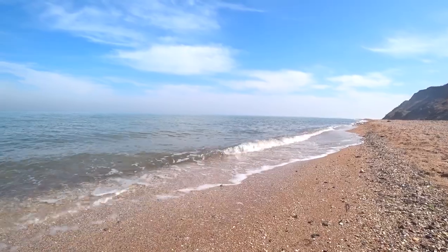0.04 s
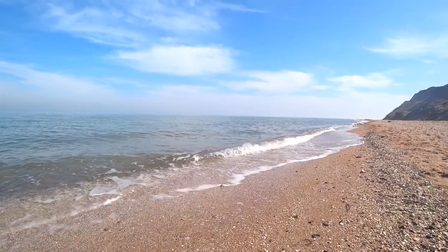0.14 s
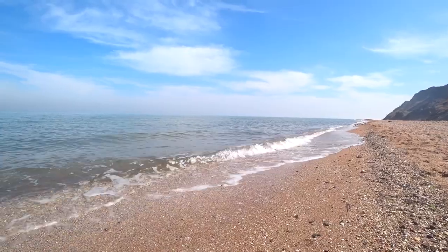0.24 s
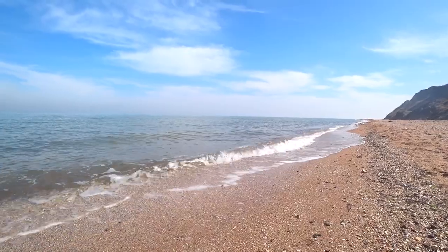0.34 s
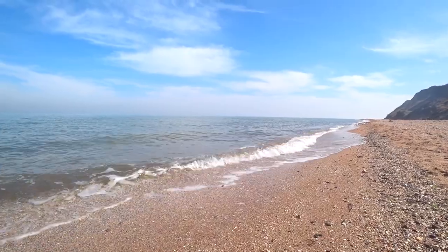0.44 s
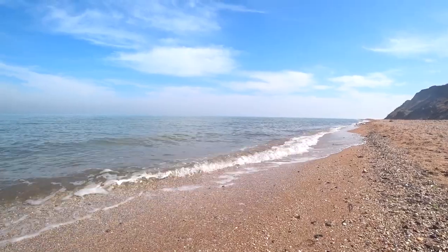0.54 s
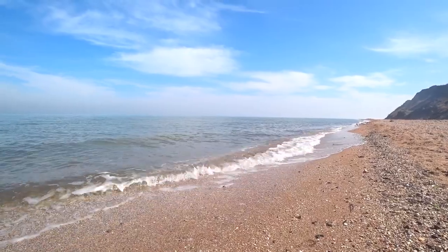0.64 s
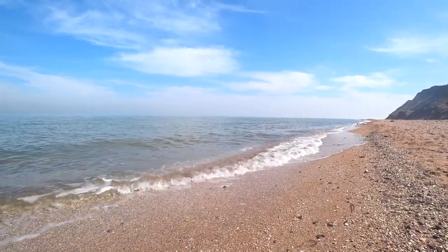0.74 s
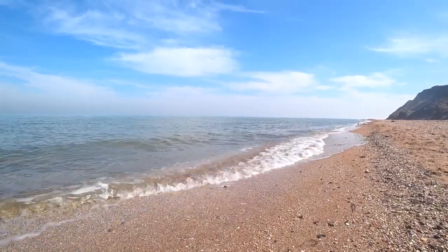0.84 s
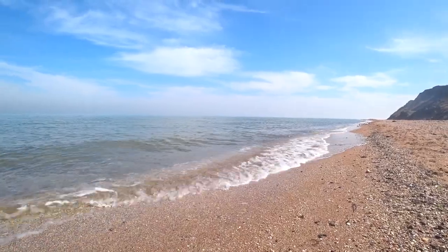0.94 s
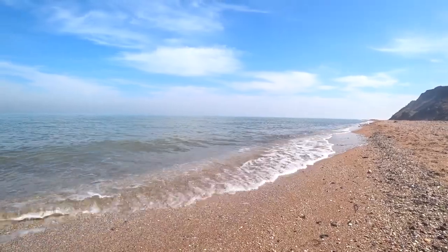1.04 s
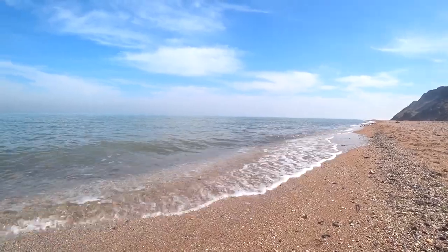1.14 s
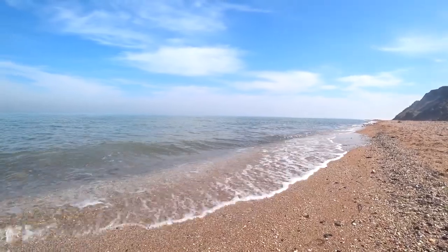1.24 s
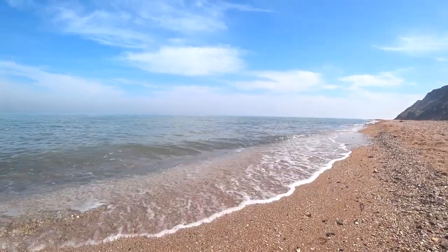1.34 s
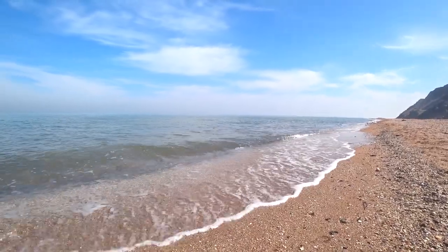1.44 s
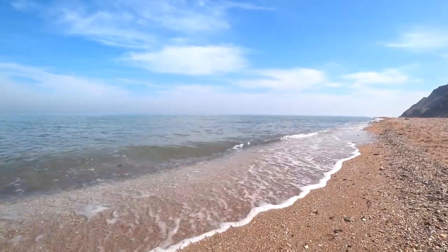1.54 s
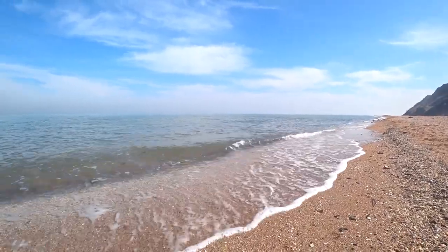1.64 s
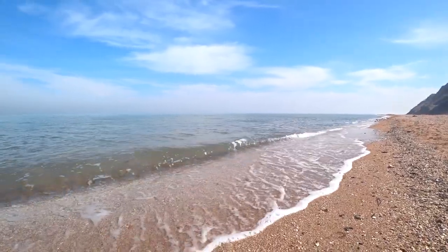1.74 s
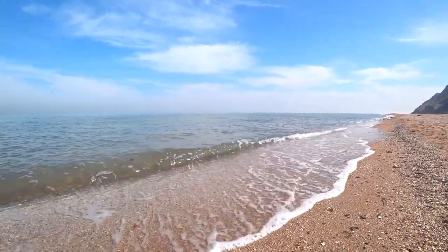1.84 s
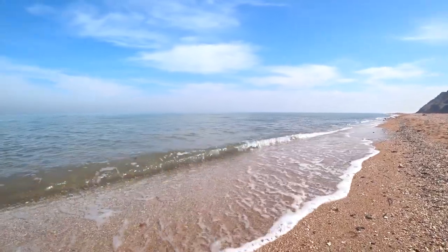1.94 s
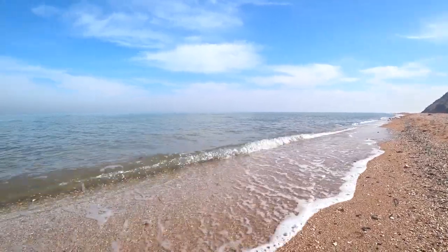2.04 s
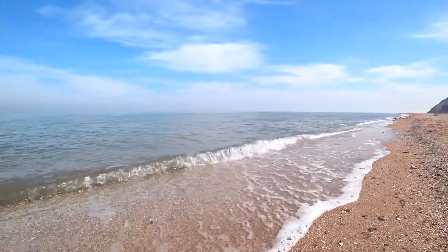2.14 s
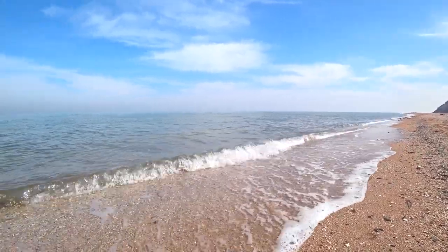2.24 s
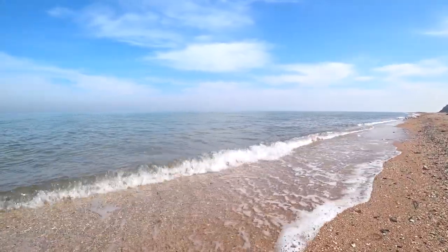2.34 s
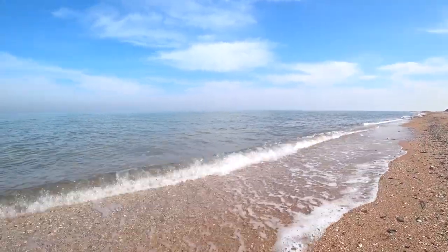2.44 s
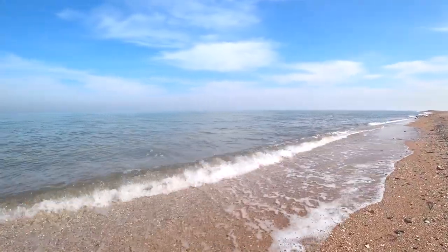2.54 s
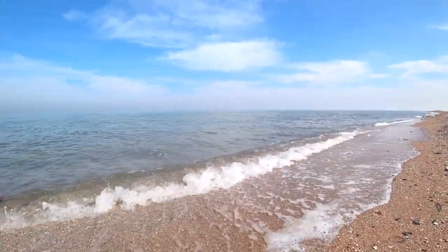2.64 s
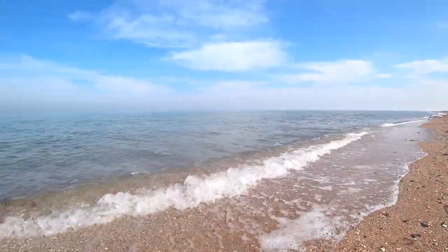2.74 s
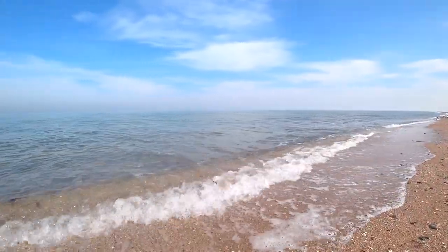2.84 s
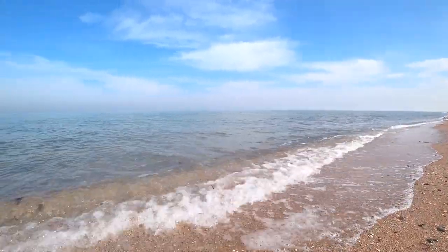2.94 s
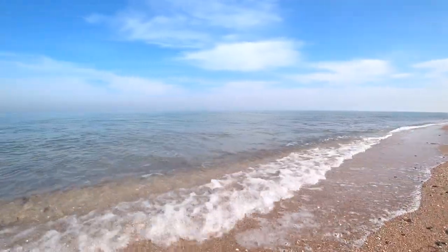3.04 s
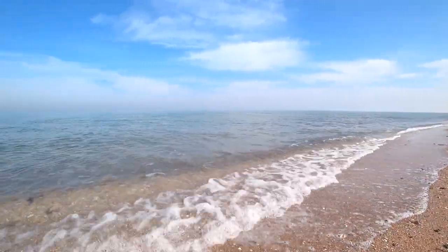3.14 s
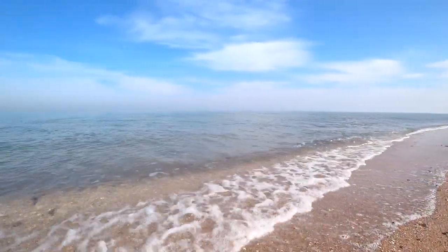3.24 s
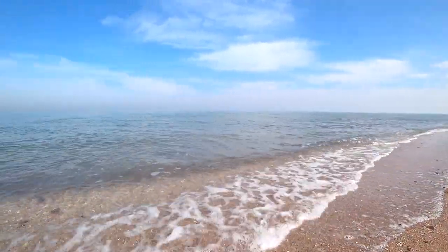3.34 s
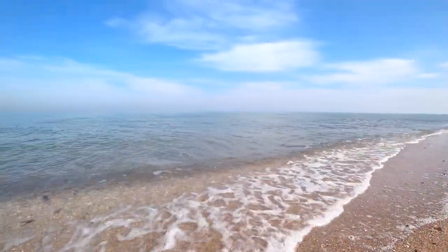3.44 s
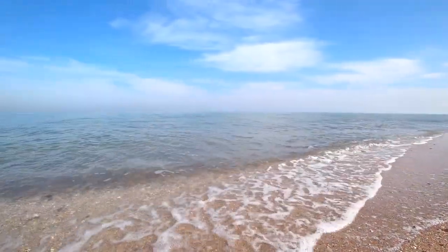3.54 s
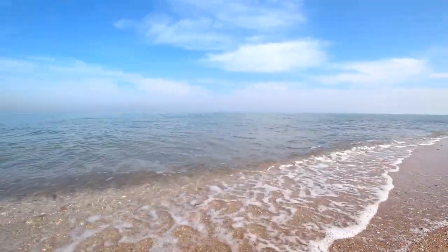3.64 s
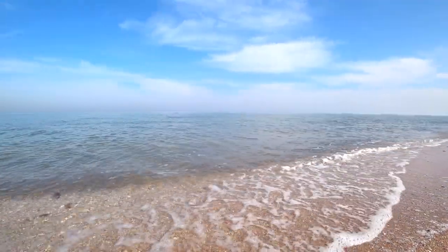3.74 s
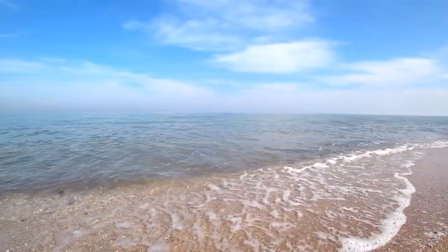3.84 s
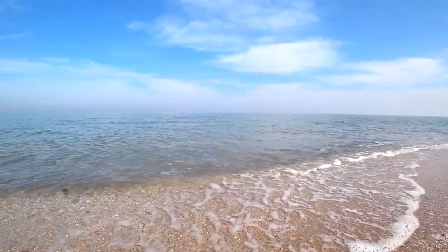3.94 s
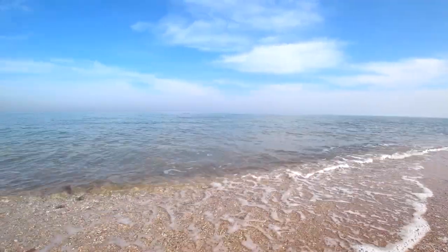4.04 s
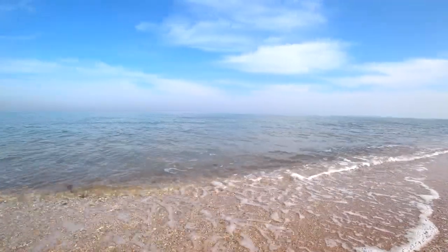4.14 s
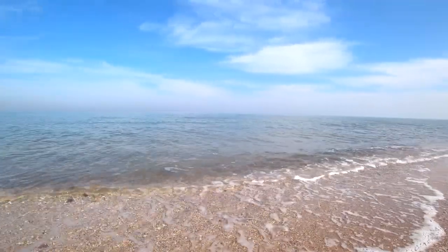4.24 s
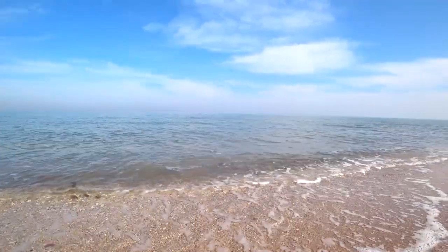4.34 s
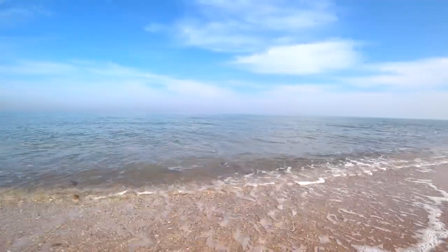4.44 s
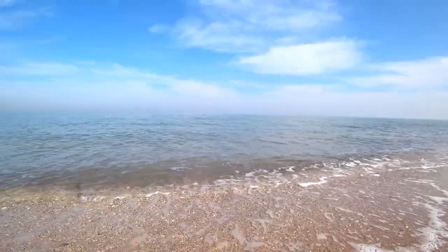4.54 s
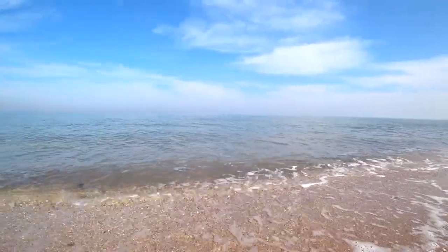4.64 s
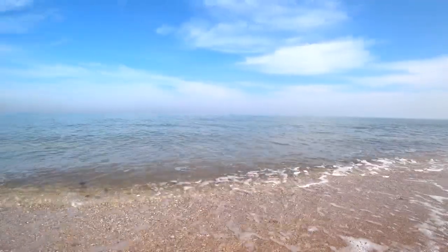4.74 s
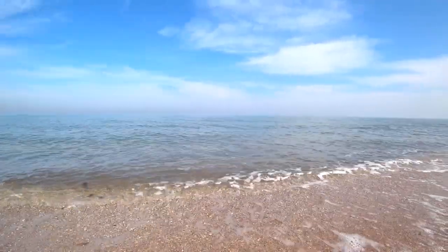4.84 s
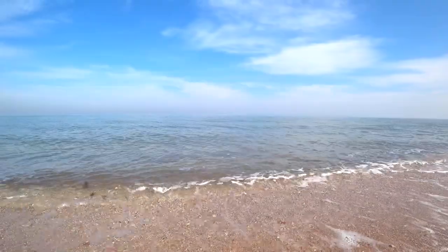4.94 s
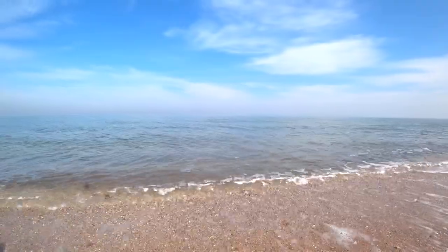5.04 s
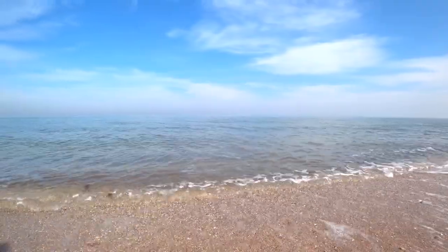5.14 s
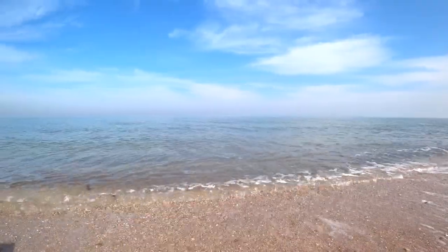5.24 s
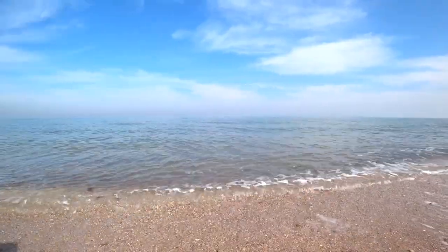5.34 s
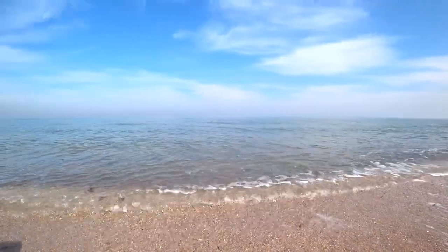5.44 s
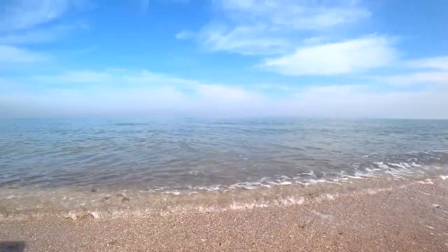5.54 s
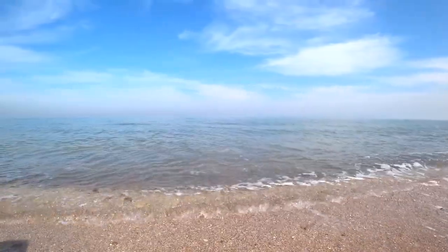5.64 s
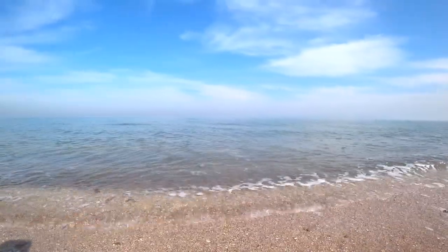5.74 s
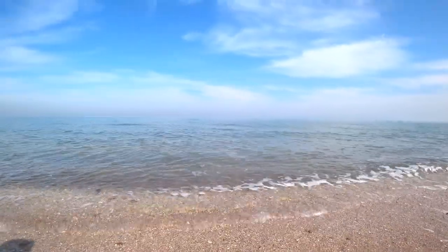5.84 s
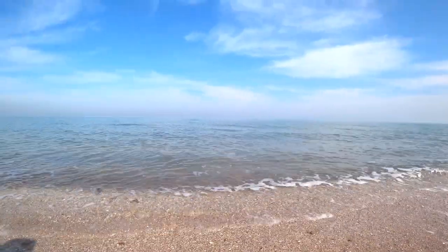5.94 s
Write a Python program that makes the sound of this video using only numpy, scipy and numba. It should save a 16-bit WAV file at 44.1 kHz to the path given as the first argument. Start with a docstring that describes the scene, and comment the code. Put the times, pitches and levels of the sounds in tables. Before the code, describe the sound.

A bright, watery wavelet plunges and fizzes, quiets to gurgles, then a bigger one crashes and drains, and a small lap follows.

```python
"""Small waves on a shell and sand beach

Breakers a few steps away are clouds of ringing bubbles, each a damped sinusoid with a rising pitch.
Their foam hisses as a denser cloud of finer bubbles, and single bubbles and drops pop out of it.
Other wavelets along the shore make a dull, wide wash of filtered noise with drifting patches.
A very faint low rumble lies beneath; two microphones cut the bass steeply and limit the band."""
import sys
import numpy as np
from scipy import signal
from scipy.io import wavfile
from scipy.ndimage import uniform_filter1d
from numba import njit

SR = 44100
rng = np.random.default_rng(int(sys.argv[2]) if len(sys.argv) > 2 else 0)


def inscribe(sig):
    """Save sig as 16-bit PCM at rate SR to the path in sys.argv[1].

    A 1-D sig is mono; a 2-D sig holds one channel per row.
    Samples are clipped to [-1, 1] before scaling.
    """
    pcm = np.round(np.clip(np.atleast_2d(sig).T, -1, 1) * 32767)
    wavfile.write(sys.argv[1], SR, pcm.astype(np.int16))


N = 264159

# In all tables a positive left-right level means louder on the left; levels precede the low cut.
# Surges of bubbling water: three breakers, their crests tipping and plunging, a small lap, two backwashes.
# Each row: time of full strength in seconds, level in dB, rise in dB/s, hold in seconds, initial fall in dB/s,
# extra level of the big bubbles in dB, left-right in dB, extra width in dB,
# level shift by splashing in dB (halved in use; negative lowers the level at a slap).
BREAKER_SURGES = [(0.0, -29.5, 50, .76, 72, 3.5, -1, -12.5, -0.3),
                  (.15, -34.5, 87, 0.032, 45, 14, -4, -14, -4), (.9, -40, 22, 0.88, 31, 6.5, -0.5, -8, 2.5),
                  (1.41, -42, 68, 0.014, 87, 16, 11, -9, 6), (2.0, -34.5, 93, 0.055, 33, 2, -3, -4, 2),
                  (2.22, -23.5, 55, .5, 23.5, -2.5, 0.5, -10, -1.5),
                  (2.34, -27, 72, 0.13, 90, 20, 0, -9, 0), (3.95, -44.5, 6.5, 1.6, 19, 5, 3.5, -7, 2),
                  (5.52, -33.5, 59, .13, 23, -3.5, -2, -11, 1.2)]
# Surges of hissing foam.
# Each row: time of full strength in seconds, level in dB, rise in dB/s, hold in seconds, initial fall in dB/s,
# extra level of the finest bubbles in dB, left-right in dB, extra width in dB,
# level shift by splashing in dB (negative lowers the level at a slap).
FOAM_SURGES = [(0.0, -33, 50, 0.068, 9, -4, -2, -16, 1.5), (1.08, -39.5, 23, 0.09, 14, -5, 1, -9.5, 1),
               (2.08, -35, 85, 0.055, 30, -10, -3, -12, 1),
               (2.24, -25, 43, 0.21, 30, -8.5, -0.5, -13.5, 1.8), (2.6, -34.5, 32, 0.21, 55, -1, 2, -10, 2),
               (3.38, -41.5, 29, 0.18, 10.5, 4, 0, -9.5, -0.8), (5.3, -52.5, 6, .1, 32, 3.5, -4, -9, 3),
               (5.46, -40, 150, 0.13, 63, -2.5, 0, -9, 2.5), (5.7, -46.5, 60, 0.035, 150, -5, 3, -3, 3.5)]
# How strongly each bubble size sounds in a breaker. Each row: pitch in Hz, relative density in dB per Hz.
BREAKER_SPECTRUM = [(30, -58), (100, -70), (170, -49.5), (250, -14.5), (430, -7), (800, 1.5), (1400, 0),
                    (2100, 2), (2900, -2), (3900, -1.5), (6000, -10.5), (11500, -20)]
# The same for the foam. Each row: pitch in Hz, relative density in dB per Hz.
FOAM_SPECTRUM = [(600, -30), (1500, -26), (3000, -3.5), (4500, -1.5), (6000, 0), (8000, -6), (11500, -8)]
# What differs between the microphones, against what they share, for near bubbles.
# Each row: frequency in Hz, level in dB.
NEAR_DIFFERENCE = [(60, -10), (270, -3.5), (600, -15), (1200, -21), (2500, -7.5), (5400, 0.5), (11000, 3)]
# Wavelets along the shore. Each row: time in seconds, level in dB, left-right in dB.
SHORE_LEVELS = [(0, -39, -5), (.7, -40, 1), (1.1, -47, 12), (1.45, -41.5, 6), (1.85, -41, 0),
                (2.2, -34.5, 5), (2.6, -29.5, 2), (3.0, -35.5, 3), (3.3, -42, 2.5), (3.65, -44, -5.5),
                (3.82, -42.5, -5.5), (3.95, -40, -5.5), (4.12, -39.5, 1), (4.4, -39, 1.5), (4.72, -41, -2),
                (5.0, -37, -1.5), (5.35, -37.5, -1), (5.65, -37, 2), (5.82, -42, -6.5), (5.99, -36, -5)]
# Spectrum of the distant wash. Each row: frequency in Hz, relative density in dB per Hz.
WASH_SPECTRUM = [(30, -50), (100, -57), (210, -23.5), (400, -5.5), (900, 4.5), (1600, 1.5), (2500, -2.5),
                 (3500, -7), (5000, -15.5), (8000, -17.5), (11500, -23)]
# What differs between the microphones, against what they share, for the wash.
# Each row: frequency in Hz, level in dB.
FAR_DIFFERENCE = [(60, -8), (270, -12), (600, -10), (1200, -2), (2500, -0.5), (5400, -1.5), (11000, -1)]
# Single bubbles and drops. Each row: start in seconds, level in dB before the swell-in, starting pitch in Hz,
# left-right in dB, decay time in cycles.
SINGLE_POPS = [(.3882, -12.5, 1760, -4, 1.2), (.4562, -7.5, 8220, 1, 1.3), (.5685, -15, 3260, 0, 2.3),
               (.6388, -15.5, 786, 0, 2.8), (0.6678, -14, 2150, 0, 2.2), (0.7075, -12, 1600, 2, 1.6),
               (0.729, -16, 1750, 7, 1.6), (0.776, -20, 1750, 3, 1.5), (.7429, -13, 3760, 0, 3.2),
               (.8628, -14, 5530, -2, 1.5), (0.8733, -17, 3690, 1, 2), (.9, -22, 3280, 3, 2.5),
               (1.063, -29, 635, 2, 3.1), (1.091, -25.5, 1390, 6, 3.3), (1.118, -35, 400, 2, 2.2),
               (1.1368, -31, 1900, 8, 4.8), (1.1539, -16, 6450, 5, 1.3), (1.278, -25, 1940, 4, 4),
               (1.291, -29.5, 863, 2, 6), (1.3097, -31, 3000, 8, 8), (1.332, -31, 3560, 11, 8),
               (1.36, -30.5, 1950, 7, 10), (1.3833, -35, 400, 1, 2.5), (1.422, -22.5, 1305, 11, 4.2),
               (1.4368, -21, 3980, 9, 1.5), (1.4402, -25.5, 640, 5, 3.1), (1.4385, -36, 330, 2, 7.9),
               (1.447, -33, 495, 3, 3), (1.4638, -42, 334, 2, 3.1), (1.6483, -39, 435, -2, 2.3),
               (1.7042, -43.5, 302, 1, 3.5), (1.9861, -16, 4900, -6, 2.2), (2.0036, -19.5, 3230, -3, 6),
               (2.1769, -23, 600, 1, 4.8), (2.202, -13.5, 1060, -1, 2.3), (2.2396, -15.5, 1880, -3, 6),
               (2.3083, -16, 1290, 0, 2.5), (2.4095, -6.5, 860, -3, 0.51), (2.44, -5, 3200, 7, 1.3),
               (2.5135, -11, 3570, 0, 4.5), (2.516, -13.5, 1840, 4, 6.9), (2.535, -32, 125, 1.5, 1.9),
               (2.675, -26, 422, 0, 1.9), (2.7884, -22, 6890, 4, 6.3), (2.9924, -25, 6900, 3, 5.6),
               (3.058, -22, 7800, -1, 2.5), (3.0765, -18.5, 2160, -2, 3.3), (3.0173, -26, 5120, 2, 9),
               (4.078, -27, 3160, 13, 1.9), (4.2337, -43, 420, 3, 5), (4.6212, -25, 4100, 2, 1.5),
               (4.6598, -22.5, 1450, 6, 2.9), (4.6764, -32, 3870, 6, 5.5), (4.856, -35, 388, -1, 1.5),
               (5.1839, -27, 3910, 2, 1.3), (5.3461, -16.5, 3040, -6, 0.82), (5.381, -23, 5250, -5, 1.5),
               (5.457, -24, 6920, -5, 2.5), (5.4748, -27, 5950, -1, 4), (5.4862, -23, 9800, 1, 2.5),
               (5.4289, -26, 3240, -5, 4.7), (5.4961, -28, 2780, 5, 6), (5.5338, -23, 1310, -4, 2.5),
               (5.712, -25, 6500, 0, 2), (5.9241, -23, 3330, -13, 1.7), (5.5427, -25, 5640, 1, 9),
               (5.5715, -25.5, 1340, -7, 4), (5.5726, -12, 4780, 2, 1.3), (5.5984, -28, 2830, 2, 9),
               (5.6421, -23, 5760, -1, 2.5), (5.6412, -24, 945, 5, 3), (5.6747, -24, 7600, 0, 4),
               (5.7383, -18, 6130, 2, 1.8), (5.738, -20, 3000, -1, 2.3), (5.7471, -19.5, 2190, 3, 5.7)]

SWELL_CYCLES = .4  # time constant of a bubble's onset, in cycles of its starting pitch
STEEPENS_PER_S = 0.48  # a surge dies faster the longer it has been falling
LOW_CUT_HZ, EDGE_HZ = 163, 11035
RUMBLE_DB, RUMBLE_FOLLOWS = -84.5, .4  # level in dB at mean bubbling; dB of rumble per dB of bubbling


def gain_of(db):
    """Amplitude ratio by the definition of the decibel."""
    return 10 ** (np.asarray(db) / 20)


def evened(x):
    """Normalization to a root-mean-square value of 1."""
    return x / np.sqrt(np.mean(x ** 2) + 1e-20)


def read(points, hz):
    """Linear interpolation of a spectrum in dB along a logarithmic frequency axis."""
    f, value = np.transpose(points)
    return np.interp(np.log(hz + 1), np.log(f + 1), value)


def columns(rows, t):
    """Linear interpolation in time of each column after the first."""
    s, *rest = np.transpose(rows)
    return [np.interp(t, s, c) for c in rest]


def sides(pan_db):
    """Stereo placement by level difference, split equally between left and right."""
    return gain_of([pan_db / 2, -pan_db / 2])


def drift(shape, span):
    """Slow random variation by repeated averaging of white noise, with rms 1."""
    return evened(uniform_filter1d(uniform_filter1d(rng.standard_normal(shape), span), span))


@njit
def bubble(count, start, hz, cycles, left, right, glide, swell_cycles, rate):
    """Damped oscillation: a bubble swells quickly, then rings out, rising in pitch as it nears the surface."""
    out = np.zeros((2, count))
    for k in range(len(hz)):
        step = hz[k] / rate  # cycles per sample
        ring = 1 + 0j
        turn = np.exp(step * (2j * np.pi - 1 / cycles[k]))
        # per starting cycle, the pitch rises by 2 * glide of its starting value
        rise = np.exp(4j * np.pi * glide * step ** 2)
        lack, fill = 1., np.exp(-step / swell_cycles)
        end = min(start[k] + int(4 * cycles[k] / step), count)
        for n in range(start[k], end):
            value = (1 - lack) * ring.imag
            out[0, n] += left[k] * value
            out[1, n] += right[k] * value
            ring, turn, lack = ring * turn, turn * rise, lack * fill
    return out


def splashes():
    """Random impulses with exponential decay: water slaps down suddenly and dies in a few ms; rms 1."""
    slaps = (rng.random(N) < 110 / SR) * rng.exponential(1, N)
    fading = signal.lfilter([1], [1, -np.exp(-1 / (0.0027 * SR))], slaps)
    capped = np.tanh(fading / 1.2)  # overlapping slaps do not pile up without end
    return evened(capped - capped.mean())


def swells(rows):
    """Addition of powers: rising, held and falling surges sum, and their other columns are power-weighted."""
    s, db, rise, hold, fall, *rest = np.transpose(rows)[..., None]
    t = np.arange(0, N + 64, 64) / SR
    before = np.maximum(s - t, 0)
    after = np.maximum(t - s - hold, 0)
    fallen_db = fall * after * (1 + STEEPENS_PER_S * after)
    power = gain_of(db - rise * before - fallen_db) ** 2
    total = power.sum(0)
    slow = [10 * np.log10(total)] + [(power * c).sum(0) / total for c in rest]
    return [np.interp(np.arange(N) / SR, t, c) for c in slow]


def cloud(level_db, spectrum, low_hz, share, spread_db, cycles, big_db, fine_db, width_db, pan_db):
    """Superposition of thousands of bubbles a second, random in size, decay and place; a few are much louder."""
    chances = rng.random((int(16500 * N / SR), 6))
    born = chances[chances[:, 5] < share]
    moment, pitch, luck, ring, place = born[np.argsort(born[:, 0]), :5].T
    at = (moment * N).astype(np.int64)
    hz = low_hz + pitch * (11800 - low_hz)
    # most burst at once, some ring on
    shortest, longest = cycles
    decay_cycles = shortest * (longest / shortest) ** (ring ** 3)

    weight = gain_of(read(spectrum, hz) - spread_db * np.log(luck + 0.0065))
    weight = weight / np.sqrt(np.sum(weight ** 2) / N)
    big_tilt_db = big_db[at] / (1 + (hz / 600) ** 2)
    fine_tilt_db = fine_db[at] / (1 + (7000 / hz) ** 4)
    # a longer ring starts softer, which offsets the energy its length adds
    equal_energy = 2 * np.sqrt(hz / SR / decay_cycles)
    amplitude = weight * equal_energy * gain_of(level_db[at] + big_tilt_db + fine_tilt_db)

    lean = np.sqrt(3) * (2 * place - 1) * gain_of(read(NEAR_DIFFERENCE, hz) + width_db[at])
    left, right = amplitude * np.array([1 + lean, 1 - lean]) * sides(pan_db[at])
    return bubble(N, at, hz, decay_cycles, left, right, 0.00284, SWELL_CYCLES, float(SR))


def breakers():
    """Bubble resonance: slaps shift many bubbles' level together, up or, where splashing is negative, down."""
    db, big_db, pan_db, width_db, splash_db = swells(BREAKER_SURGES)
    level_db = db + .5 * splash_db * splashes()
    return cloud(level_db, BREAKER_SPECTRUM, low_hz=110.4, share=.7, spread_db=1.9, cycles=(2., 16.),
                 big_db=big_db, fine_db=0 * db, width_db=width_db, pan_db=pan_db)


def foam():
    """Bubble resonance at higher pitches: many fine bubbles fuse into a fizz."""
    db, fine_db, pan_db, width_db, splash_db = swells(FOAM_SURGES)
    level_db = db + splash_db * splashes()
    return cloud(level_db, FOAM_SPECTRUM, low_hz=1520, share=.8, spread_db=1.14, cycles=(1.8, 16.),
                 big_db=0 * db, fine_db=fine_db, width_db=width_db, pan_db=pan_db)


def shore():
    """Incoherent summation: distance blends the far wavelets into noise with drifting patches."""
    frames, hz = N // 256 + 5, np.fft.rfftfreq(1024, 1 / SR)
    a, b, c, d, patches = rng.standard_normal((frames, 513, 5)).T
    # smooth the patches over frequency, then time
    patches = uniform_filter1d(patches, size=12, axis=0)
    patches = evened(uniform_filter1d(patches, size=10, axis=1))
    shared = a + 1j * b
    apart = (c + 1j * d) * gain_of(read(FAR_DIFFERENCE, hz))[:, None]
    color = gain_of(read(WASH_SPECTRUM, hz)[:, None] + 1.1 * patches)
    z = np.array([shared + apart, shared - apart]) * color
    wash = evened(signal.istft(z, nperseg=1024, noverlap=768)[1][:, :N])
    level_db, pan_db = columns(SHORE_LEVELS, np.arange(N) / SR)
    return gain_of(level_db) * sides(pan_db) * wash


def rumble():
    """Band-limited noise with amplitude modulation: faint, lumpy, and stronger when the water is loud."""
    shared, left, right = rng.standard_normal((3, N))
    lumps = gain_of(4 * drift(N, span=1500))
    noise = np.array([shared + .3 * left, shared + .3 * right]) * lumps
    band = signal.butter(2, [40, 110], "band", fs=SR, output="sos")
    low = evened(signal.sosfilt(band, noise))
    water_db = swells(BREAKER_SURGES)[0]
    return gain_of(RUMBLE_DB + RUMBLE_FOLLOWS * (water_db - water_db.mean())) * low


def pops():
    """Damped oscillation of single bubbles and drops, loud enough to stand out of the wash."""
    s, db, hz, pan_db, cycles = np.transpose(SINGLE_POPS)
    left, right = gain_of(db) * sides(pan_db)
    at = (s * SR).astype(np.int64)
    return bubble(N, at, 1. * hz, 1. * cycles, left, right, 0.003, SWELL_CYCLES, float(SR))


def scene():
    """Linear superposition of the near breakers and foam, the far shore and the single pops."""
    return breakers() + foam() + shore() + pops()


def record(dry):
    """Linear filtering: the microphones cut the bass steeply, rumble is added, then the band is limited."""
    low_cut = signal.butter(5, LOW_CUT_HZ, "high", fs=SR, output="sos")
    thin = signal.sosfilt(low_cut, dry) + rumble()
    band_limit = signal.firwin(3001, EDGE_HZ, window=("kaiser", 8), fs=SR)
    return signal.oaconvolve(thin, band_limit[None], "same")


dry = scene()
out = record(dry)
inscribe(out)
```